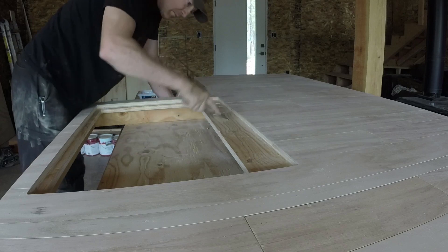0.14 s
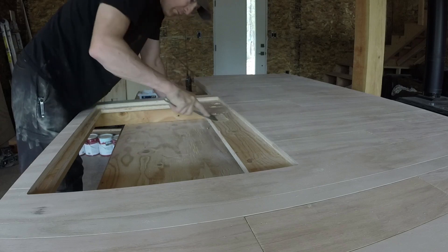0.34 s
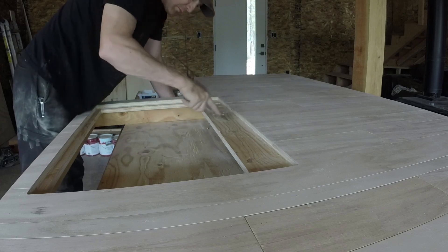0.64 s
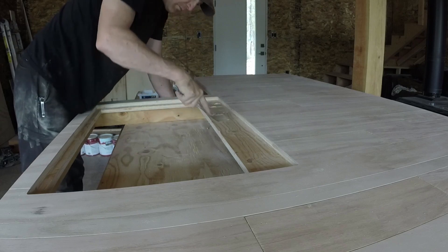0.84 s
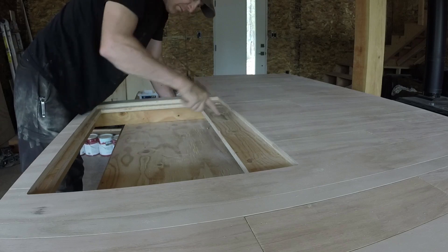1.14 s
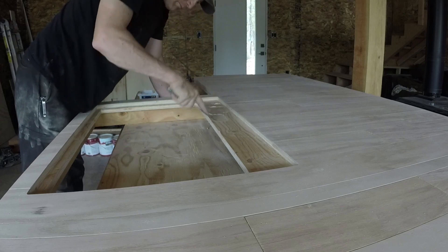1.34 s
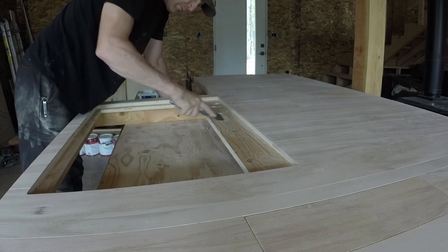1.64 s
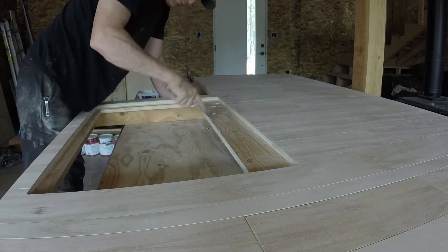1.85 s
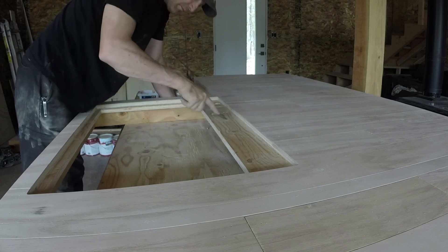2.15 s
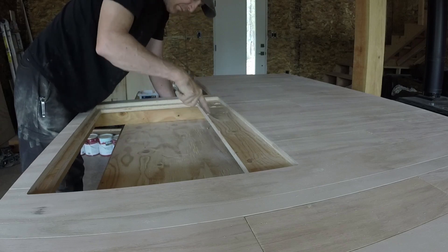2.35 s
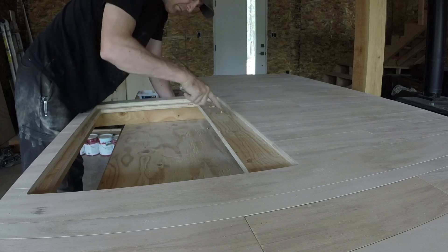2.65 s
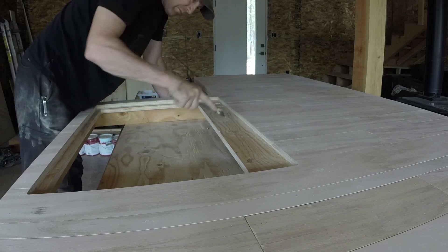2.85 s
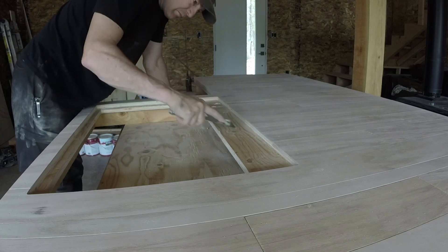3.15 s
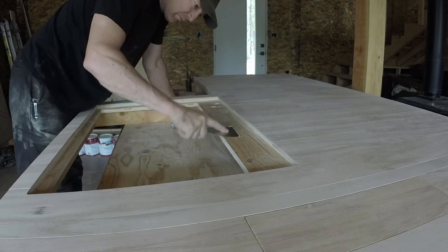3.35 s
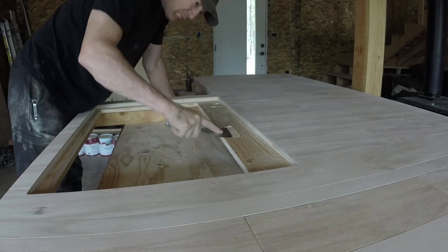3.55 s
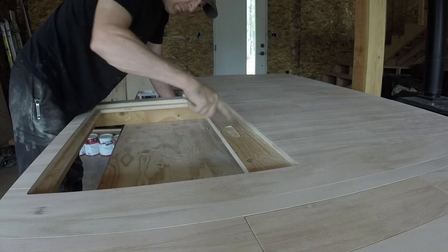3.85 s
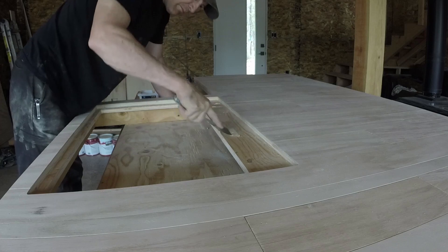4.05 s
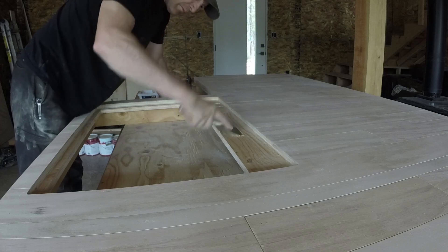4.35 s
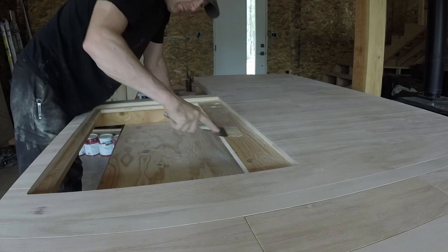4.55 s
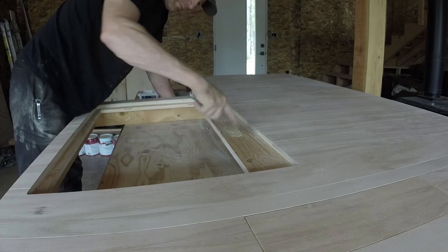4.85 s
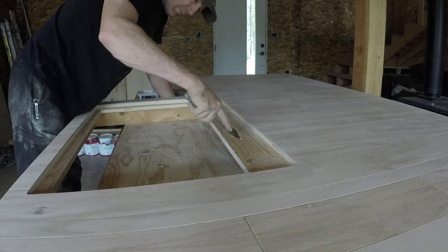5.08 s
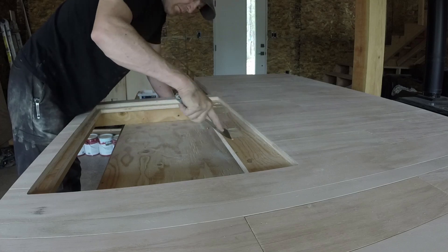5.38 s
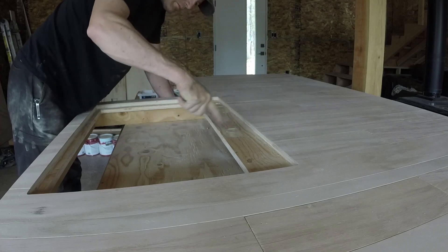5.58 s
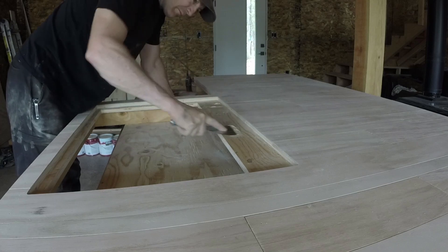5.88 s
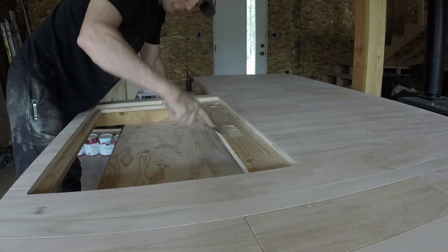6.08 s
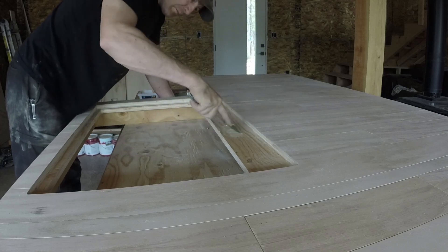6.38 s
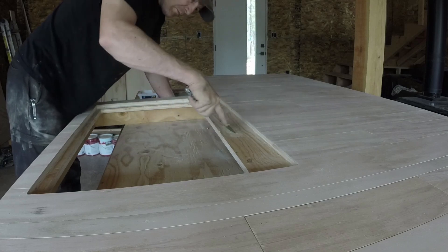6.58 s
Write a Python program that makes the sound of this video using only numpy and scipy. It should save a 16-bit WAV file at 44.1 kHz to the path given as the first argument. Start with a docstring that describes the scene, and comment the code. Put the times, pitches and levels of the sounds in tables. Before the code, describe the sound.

In a workshop, a small hand scraper works the edge of an opening in a large wooden deck. Quick dry rasps, each a brief hiss ending in a biting cut, alternate with woody, metallic knocks as the blade lands again. Around the middle, a cluster of soft low bumps shakes the frame. The microphone is fairly close; short room echoes and a faint low rumble surround the work.

```python
"""Hand scraper on a wooden deck

In a workshop, a small steel scraper is worked along the edge of a hatch opening in a big wooden deck.
The blade lands with a knock: filtered rattles and damped modes of steel, boards and frame.
Then it is drawn back: dense random snaps stand for breaking fibres and ring the tool and the boards.
Dull bumps sound through the frame between strokes. The room answers with early echoes and a noise tail,
and a low rumble of filtered noise lies under it all."""
import sys
import numpy as np
from scipy import signal
from scipy.fft import rfft, irfft
from scipy.io import wavfile

SR = 44100
rng = np.random.default_rng(int(sys.argv[2]) if len(sys.argv) > 2 else 0)


def int16_out(signal):
    """Quantize to a 16-bit WAV file."""
    q = np.round(np.clip(np.atleast_2d(signal).T, -1, 1) * 32767)
    wavfile.write(sys.argv[1], SR, q.astype(np.int16))


N = 296352  # length in samples


def undb(db):
    """Decibels to gain."""
    return 10 ** (np.asarray(db) / 20)


def seconds(length):
    """Time axis of the given length."""
    return np.arange(int(length * SR)) / SR


def unit(x):
    """Scale to an rms of one."""
    return x / np.sqrt(np.mean(x ** 2))


def blow(x):
    """Scale a short sound to the energy of a hundredth of a second at an rms of one."""
    return x * np.sqrt(SR / 100 / np.sum(x ** 2))


def unit_energy(x):
    """Scale an impulse response to an energy of one."""
    return x / np.sqrt(np.sum(x ** 2))


def fade(t, t60):
    """Exponential decay, 60 dB down after t60 seconds."""
    return np.exp(-np.log(1000) * t / t60)


def swell(t, rise, fall):
    """Grows exponentially up to t = 0, then dies away; both times are for a factor of e."""
    return np.exp(np.minimum(t / rise, -t / fall))


def at_hz(hz, points):
    """Read a (Hz, value) table on a log-frequency axis."""
    f, value = np.transpose(points)
    return np.interp(np.log(np.maximum(hz, 1)), np.log(f), value)


def convolve(x, response):
    """Pass a sound through an impulse response, keeping its length."""
    return signal.fftconvolve(x, response)[:len(x)]


def colour(x, points, size=4096):
    """Causal minimum-phase filter with the given (Hz, dB) spectrum, made by folding its cepstrum."""
    hz = np.arange(size // 2 + 1) * SR / size
    cepstrum = irfft(np.log(undb(at_hz(hz, points))))
    cepstrum[1:size // 2] *= 2
    cepstrum[size // 2 + 1:] = 0
    return convolve(x, irfft(np.exp(rfft(cepstrum))))


def add(out, start, x):
    """Mix a short sound in at the given time."""
    i = int(start * SR)
    out[i:i + len(x)] += x[:len(out) - i]


def burst(t, smear, count=7):
    """A click smeared into a brief rattle by a chain of all-passes, so that it has no pitch of its own."""
    turn = -2j * np.pi * np.arange(len(t) // 2 + 1) / len(t)
    response = 1
    # each all-pass lags by a small random share of the smear time
    for lag in np.ceil(smear * SR * rng.uniform(.004, .028, count)):
        delay = np.exp(turn * lag)
        response = response * (delay - .6) / (1 - .6 * delay)
    return irfft(response, len(t))


def ring(t, modes, scatter_db=2.2):
    """Damped modes; their shares and signs vary at random, as they depend on where the wood is touched."""
    chance = rng.standard_normal((len(modes), 2))
    out = np.zeros(len(t))
    for (hz, db, t60), (spot, sign) in zip(modes, chance):
        share = np.sign(sign) * undb(db + scatter_db * spot)
        out += share * np.sin(2 * np.pi * hz * t) * fade(t, t60)
    return out


def resonate(x, modes):
    """Drive a set of modes through a ringing response of unit energy."""
    return convolve(x, unit_energy(ring(seconds(.55), modes)))


def grains(per_second, spread_db):
    """Dense random snaps, most small and a few large."""
    happens = rng.random(N) < per_second / SR
    sizes = undb(spread_db * np.minimum(rng.exponential(size=N), 4))
    return unit(happens * sizes * np.sign(rng.standard_normal(N)))


def walk(rate):
    """Random wandering in straight lines between normal draws, rate of them a second."""
    knots = np.arange(N) / SR * rate
    return np.interp(knots, np.arange(N), rng.standard_normal(N))


# Rumble of the building, with a faint hiss above it. Each row: frequency in Hz, level in dB.
RUMBLE_SPECTRUM = [(12, -26), (20, -4.5), (82, -6), (121, -4), (174, -7.5), (205, -10.5), (242, -8.5),
                   (511, -15), (571, -19), (638, -14.5), (5090, -31.5), (13800, -45.5), (15000, -54)]


def background(level_db=-56):
    """The low steady rumble and faint hiss of the building: noise given a fixed spectrum."""
    return undb(level_db) * unit(colour(rng.standard_normal(N), RUMBLE_SPECTRUM))


# Strokes, each a quick slide that ends in a cut. Levels are relative, before the layers are mixed.
# Each row: deepest cut in seconds, cut level in dB, build-up of the cut in seconds, slide hiss in dB,
# slide peak ahead of the cut in seconds, swell of the slide in seconds, judder of the boards in dB.
STROKES = [(0.071, -35, 0.025, -49.5, 0.042, 0.072, -42.5), (0.558, -37.5, 0.023, -47, 0.054, 0.02, -46.5),
           (1.005, -40.5, 0.05, -52.5, .035, 0.055, -41.5),
           (1.468, -42.5, 0.025, -51.5, 0.041, 0.041, -45.5), (1.954, -44.5, 0.02, -50, .06, 0.02, -44),
           (2.552, -34.5, 0.044, -47, 0.04, 0.022, -43.5), (3.794, -36.5, 0.013, -49.5, .01, 0.048, -50.5),
           (4.273, -37.5, 0.039, -49, 0.053, 0.053, -44), (4.769, -39.5, .013, -49, 0.11, 0.028, -50.5),
           (5.646, -32.5, 0.045, -52.5, 0.031, 0.056, -40.5), (6.109, -48, 0.0095, -53, 0.013, 0.042, -68),
           (6.209, -38.5, 0.013, -53, .005, 0.031, -50.5), (6.714, -47, 0.025, -55.5, 0.017, 0.028, -47)]
# Light drags of the blade into place between strokes. Levels are relative, as above.
# Each row: start in seconds, end in seconds, bite in dB, hiss in dB, judder of the boards in dB.
DRAGS = [(0.3, 0.46, -65, -65, -69), (0.747, 0.94, -56, -63, -55.5), (1.757, 1.87, -61, -63, -81),
         (2.274, 2.46, -64, -64, -68), (3.478, 3.558, -70, -63, -76), (3.58, 3.72, -66, -58, -63),
         (4.1, 4.17, -60, -65, -62), (5.03, 5.13, -54, -58, -61), (5.238, 5.57, -57, -60.5, -52.5),
         (5.963, 6.06, -67, -59, -74)]
LIFT_S, JUDDER_LIFT_S = .017, .031  # the cut and the shaking fall by a factor of e once the blade lifts
JUDDER_LEAD_S = .023  # the shaking builds up over this much longer than the cut
CUT_HISS_DB, BRISK_CUT_S = -10, .019  # hiss that comes with a cut of this build-up; slower cuts hiss less
SLIDE_BITE_DB, SLIDE_JUDDER_DB = -2, -13.5  # relative to the hiss of a slide
DRAG_RAMP_S = .038  # time for a drag to touch and to let go


def stroke_gains():
    """Bite, hiss and judder: the edge hisses as it gathers speed, digs in, shakes the boards and lifts."""
    t = np.arange(N) / SR
    bite, hiss, judder = np.zeros((3, N))
    for deepest, cut_db, build, slide_db, ahead, width, judder_db in STROKES:
        since = t - deepest
        contact = np.exp(-np.maximum(since, 0) / LIFT_S)
        speed = np.exp(1 - np.hypot(1, (since + ahead) / width))  # a bell, fastest a little ahead of the cut
        slide = undb(slide_db) * contact * speed
        cut = undb(cut_db) * swell(since, build, LIFT_S)
        bite += np.hypot(cut, undb(SLIDE_BITE_DB) * slide)
        hiss += np.hypot(slide, undb(CUT_HISS_DB) * cut * BRISK_CUT_S / build)
        judder += undb(judder_db) * swell(since, build + JUDDER_LEAD_S, JUDDER_LIFT_S)
        judder += undb(SLIDE_JUDDER_DB) * slide
    gains = np.array([bite, hiss, judder])
    for start, end, *levels_db in DRAGS:
        contact = np.interp(t, [start - DRAG_RAMP_S, start, end, end + DRAG_RAMP_S], [0, 1, 1, 0])
        gains = np.hypot(gains, np.outer(undb(levels_db), contact))
    return gains


# Colours of the scrape close to the edge: fibres bitten through, dust hissing, boards juddering.
# Each row of the three: frequency in Hz, level in dB.
BITE_SPECTRUM = [(200, -15), (600, 0), (850, -5), (1250, 0), (1750, 1), (2450, -1), (2950, -1.5),
                 (3700, -7), (5000, -13.5), (8000, -23.5), (15000, -55)]
HISS_SPECTRUM = [(1500, -23), (3500, 2.5), (6200, -1), (7500, -4), (10000, -6), (15000, -11)]
JUDDER_SPECTRUM = [(50, -22), (90, -8), (120, 0.5), (210, -1.5), (310, 1.5), (400, -3.5), (490, 5),
                   (620, -13), (1000, -11), (4000, -39)]
# Ringing of the deck boards, also heard in the knocks.
# Each row: frequency in Hz, typical level in dB, 60 dB decay in seconds.
BOARD_MODES = [(345, -6, .1), (400, -6, .1), (440, -4, .12), (472, -3, .13), (508, -2, .22), (540, -7, .15),
               (640, -6, .16), (1052, -7, .18), (1150, -5, .18), (1180, -8, .22), (1245, -10, .18),
               (1315, -9, .18), (1367, -6, .18), (1763, -7, .18), (1866, -6, .2), (1920, -6, .2),
               (2083, -7, .17), (2800, -6, .13), (2875, -2, .12), (2939, -6, .13), (3093, -3, .14),
               (3180, -3, .15)]
# Short rings of the steel blade, also heard in the knocks.
# Each row: frequency in Hz, typical level in dB, 60 dB decay in seconds.
STEEL_MODES = [(2950, 0, .025), (3170, 1, .03), (4090, -10, .025), (6065, -4, .04), (7620, -14, .025),
               (8900, -12, .03)]


def scraping(catch_db=2):
    """Fibres snap under the edge, in clumps as it catches on the grain, and shake the tool and the boards."""
    bite, hiss, judder = stroke_gains()
    catch = undb(catch_db * walk(130))
    snaps = unit(grains(per_second=5000, spread_db=2.34) * catch)
    dust = unit(grains(per_second=12000, spread_db=2.4) * catch)
    slips = grains(per_second=1400, spread_db=2.2) * catch
    rasp = undb(-3) * bite * unit(colour(snaps, BITE_SPECTRUM))
    rasp += undb(-17.5) * resonate(snaps * bite, BOARD_MODES)
    edge = undb(-5.5) * hiss * unit(colour(dust, HISS_SPECTRUM))
    edge += undb(-9.5) * resonate(dust * hiss, STEEL_MODES)
    shaking = undb(-.5) * judder * unit(colour(slips, JUDDER_SPECTRUM))
    return rasp + edge + shaking


def skid(t, t60=.064, per_second=2500):
    """Fibres crackle briefly while the blade digs in: random clicks that fade."""
    return (rng.random(len(t)) < per_second / SR) * rng.standard_normal(len(t)) * fade(t, t60)


def held_tool(hz):
    """Spectrum of the blade in the hand, which damps it, so its ring is broad."""
    return [(hz / 2, -30), (hz * .8, -9), (hz, 0), (hz * 1.2, -9), (hz * 2, -30)]


def dull(hz):
    """Spectrum of a soft blow on the frame: nearly flat from 112 Hz up to hz, then falling fast."""
    return [(50, -28), (85, -14), (112, -1), (hz, 0), (2 * hz, -19), (4 * hz, -32), (9000, -60)]


# Blade landings on the deck. Levels are relative, before the parts are summed.
# Each row: start in seconds, blade in dB, boards in dB, frame thump in dB, edge tick in dB,
# centre of the blade's ring in Hz, top of the click in Hz, room send of steel and boards in dB.
KNOCKS = [(0.2484, -33, -36, -35.5, -48.5, 2040, 4900, -4), (0.73, -60, -54, -44, -69, 2350, 9000, 5.5),
          (1.218, -24, -28.5, -31.5, -36.5, 2140, 8200, -4),
          (1.6634, -29.5, -37.5, -34.5, -43, 2060, 7200, -4),
          (2.1921, -33, -41, -42, -45.5, 1940, 7500, -2), (2.877, -58.5, -60, -57, -62.5, 2890, 12100, -3),
          (3.9951, -30, -38, -39, -41, 2160, 11200, -3),
          (4.4497, -19, -27.5, -33.5, -27.5, 2950, 13200, -5.5),
          (4.979, -33.5, -46, -34, -43, 2500, 10400, 2), (5.882, -46.5, -46, -41, -80, 1190, 7000, -2.5),
          (6.4307, -29, -34.5, -32, -36.5, 2230, 13400, 0)]
# Colours of a landing: the crack of the blade, the thud of the boards, the tick of the edge.
# Each row of the three: frequency in Hz, level in dB.
CRACK_SPECTRUM = [(200, -12.5), (500, -4), (800, -8.5), (1200, 5), (1550, -0.5), (2000, 5.5), (2550, -6),
                  (3100, 1.5), (3800, -9.5), (4500, -10.5), (7000, -30.5), (15000, -24)]
THUD_SPECTRUM = [(60, -32.5), (130, 13), (220, -2), (330, 8.5), (500, 14), (750, 2), (1200, -8),
                 (2500, -25), (8000, -31)]
TICK_SPECTRUM = [(1500, -5.5), (4000, 7.5), (6000, 1), (9000, -3.5), (15000, -5)]
# Ringing of the frame under the boards, also heard in the bumps.
# Each row: frequency in Hz, typical level in dB, 60 dB decay in seconds.
FRAME_MODES = [(111, -3, .12), (124, 0, .2), (145, -4, .09), (174, -4, .11), (200, -2, .18), (238, -5, .11)]


def knocks(rebound=.003, give=.002503, dig=.007):
    """The steel lands, rebounds and digs in (delays in s); boards and heavy frame follow a moment later."""
    direct, sent, t = np.zeros(N), np.zeros(N), seconds(.5)
    for start, blade_db, boards_db, frame_db, tick_db, blade_hz, top_hz, room_db in KNOCKS:
        boards = blow(ring(t, BOARD_MODES))
        blade = undb(-5.5) * blow(colour(burst(t, .012), held_tool(blade_hz)))
        blade += undb(-9) * blow(colour(burst(t, .016), CRACK_SPECTRUM))
        blade += undb(-11.5) * boards
        add(blade, rebound, undb(-8.5) * blow(colour(burst(t, .014), CRACK_SPECTRUM)))
        add(blade, dig, undb(-16.5) * blow(colour(skid(t), CRACK_SPECTRUM)))
        edge = blow(colour(burst(t, .02), TICK_SPECTRUM))
        edge += undb(-5.5) * blow(ring(t, STEEL_MODES))
        add(edge, dig, undb(-9) * blow(colour(skid(t), TICK_SPECTRUM)))

        # a flatter landing loses the top of its click
        soften = signal.butter(3, top_hz, fs=SR, output="sos")
        steel = signal.sosfilt(soften, undb(blade_db) * blade + undb(tick_db) * edge)
        thud = blow(colour(burst(t, .06), THUD_SPECTRUM))
        wood = undb(boards_db) * (thud + undb(-18.5) * boards)
        thump = blow(colour(burst(t, .07), dull(190)))
        frame = undb(frame_db) * (blow(ring(t, FRAME_MODES)) + undb(-4) * thump)

        add(direct, start, steel)
        add(direct, start + give, wood + frame)
        add(sent, start, undb(room_db) * steel)
        # the low frame notes go to the room at a fixed, reduced level
        add(sent, start + give, undb(room_db) * wood + undb(-4.5) * frame)
    return direct, sent


# Dull bumps on the frame, between strokes. Levels are relative.
# Each row: start in seconds, level in dB, frequency in Hz above which the body of the blow falls away.
BUMPS = [(0.76, -57, 220), (3.383, -46, 500), (3.601, -37.5, 256), (3.62, -44.5, 305), (3.654, -40, 236),
         (3.687, -45.5, 232), (3.724, -43, 212), (3.776, -48, 160), (5.576, -46, 220), (5.919, -55.5, 220)]


def bumps():
    """Soft blows that reach mainly the low notes of the woodwork: a dull rattle and the frame's modes."""
    out, t = np.zeros(N), seconds(.6)
    for start, db, hz in BUMPS:
        body = blow(colour(burst(t, .05), dull(hz)))
        frame = undb(-.5) * blow(ring(t, FRAME_MODES))
        add(out, start, undb(db) * (body + frame))
    return out


# Reverberation of the workshop. Each row: frequency in Hz, 60 dB decay in seconds.
ROOM_DECAY = [(120, 0.64), (500, 0.74), (2000, 0.58), (5000, 0.54), (12000, 0.36)]


def workshop(x, early_db=-4, gap=.008):
    """After a gap in s, quick echoes from deck and near walls with a diffuse tail that loses treble first."""
    t = seconds(.8)
    noise = rfft(rng.standard_normal(len(t)))
    hz = np.arange(len(noise)) * SR / len(t)
    octave = np.log2(np.clip(hz, 125, 16000) / 125)
    tail = np.zeros(len(t))
    for k in range(8):  # overlapping octave bands, each with its own decay
        band = irfft(noise * np.maximum(1 - abs(octave - k), 0), len(t))
        tail += band * fade(t, at_hz(125 * 2 ** k, ROOM_DECAY))
    tail = tail / np.sqrt(np.sum(fade(t, at_hz(2000, ROOM_DECAY)) ** 2))
    early = undb(early_db) * unit_energy(burst(t, .071))
    return convolve(x, np.pad(tail + early, (int(gap * SR), 0)))


def scene():
    """Strokes, knocks and bumps, heard directly and through the workshop, over the background."""
    knocked, sent = knocks()
    strokes, bumped = scraping(), bumps()
    room = workshop(sent + undb(-6) * strokes + undb(-2) * bumped)
    return (knocked + strokes + bumped + room + background())[None]


def record(dry):
    """The microphone's path cuts the top: a steep elliptic low-pass at 15350 Hz."""
    return signal.sosfilt(signal.ellip(10, .2, 70, 15350, fs=SR, output="sos"), dry)


dry = scene()
out = record(dry)
int16_out(out)
```